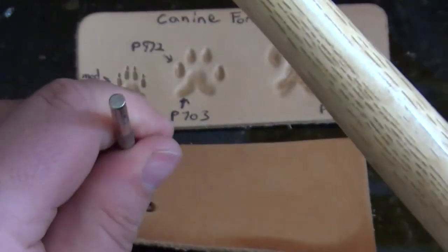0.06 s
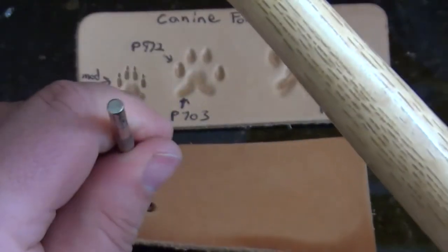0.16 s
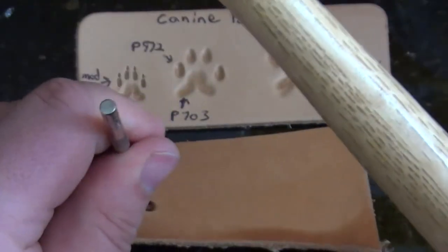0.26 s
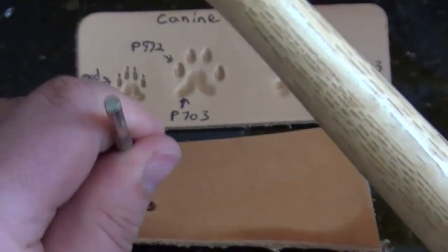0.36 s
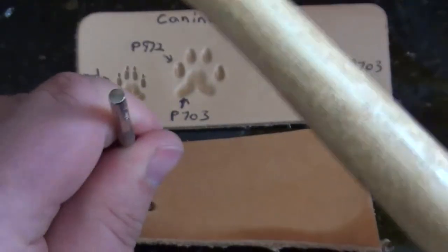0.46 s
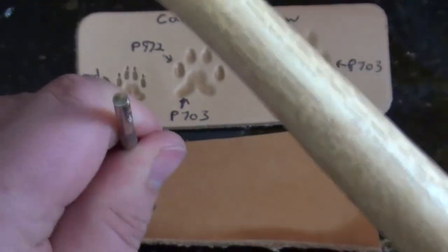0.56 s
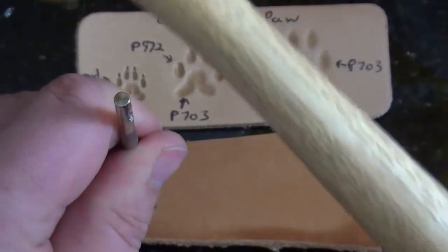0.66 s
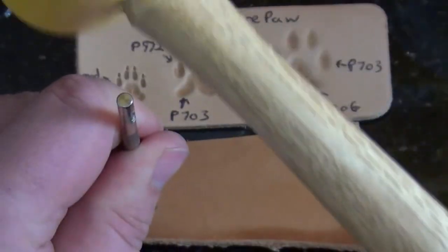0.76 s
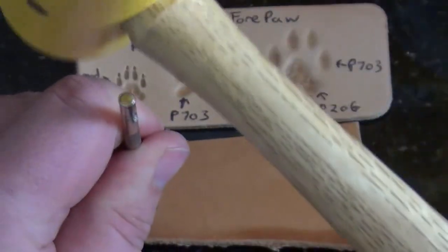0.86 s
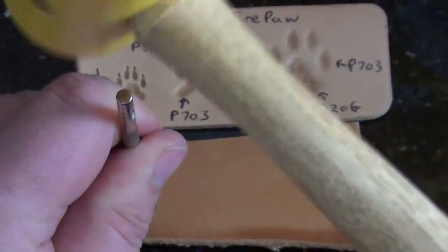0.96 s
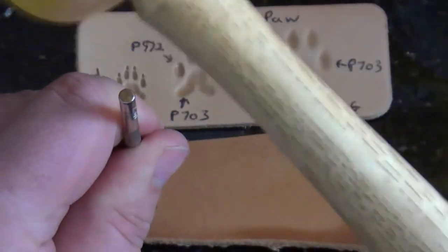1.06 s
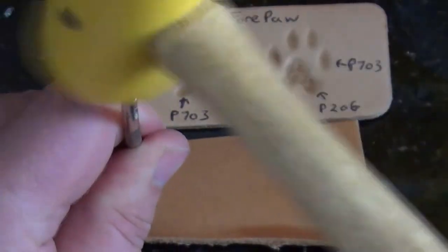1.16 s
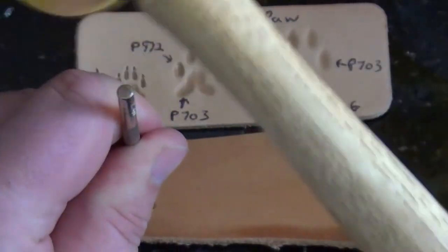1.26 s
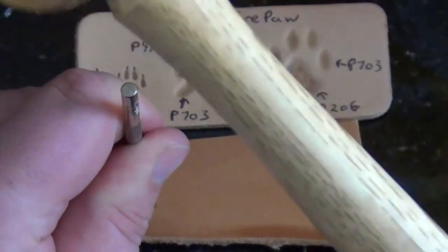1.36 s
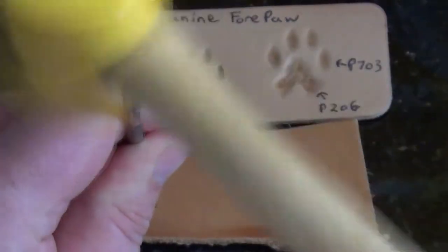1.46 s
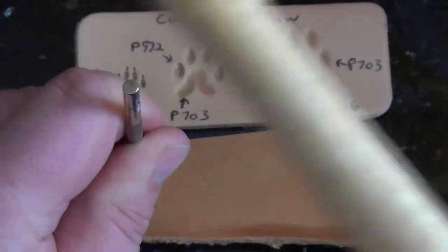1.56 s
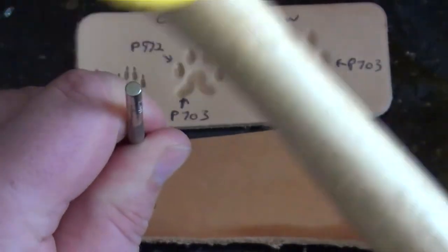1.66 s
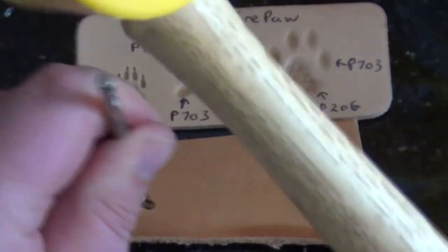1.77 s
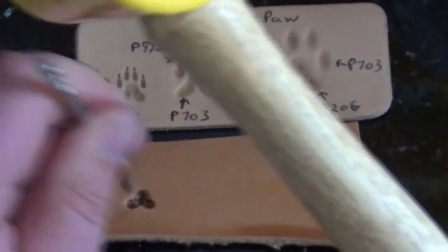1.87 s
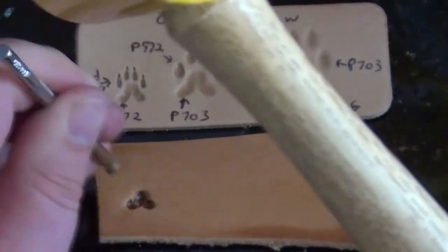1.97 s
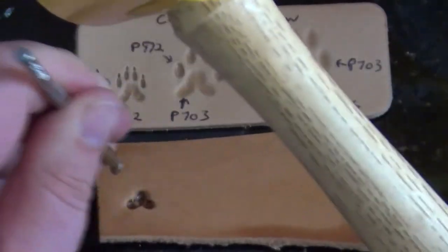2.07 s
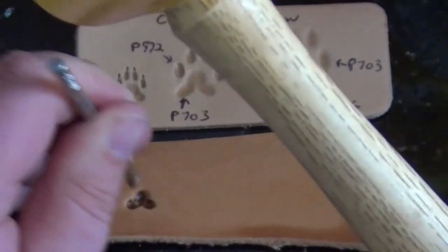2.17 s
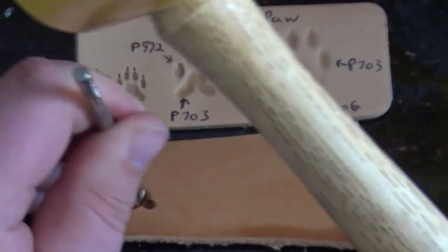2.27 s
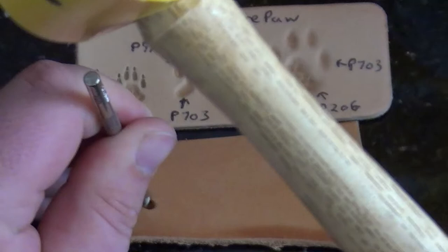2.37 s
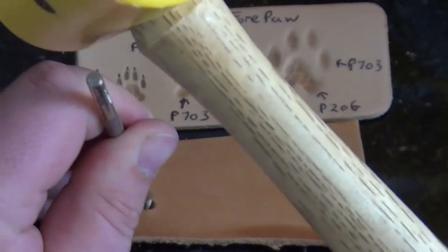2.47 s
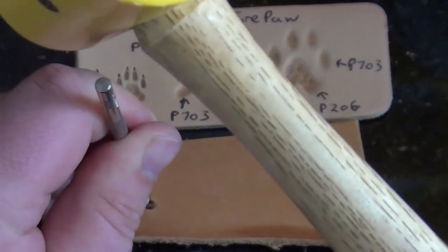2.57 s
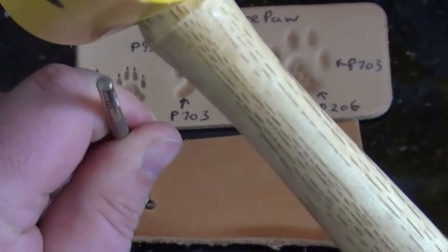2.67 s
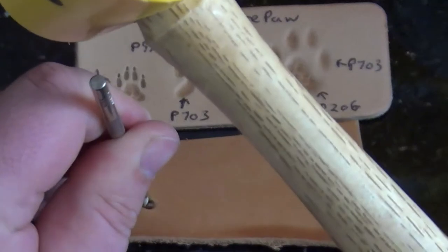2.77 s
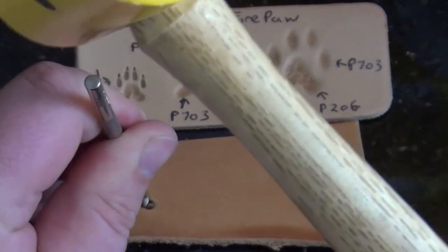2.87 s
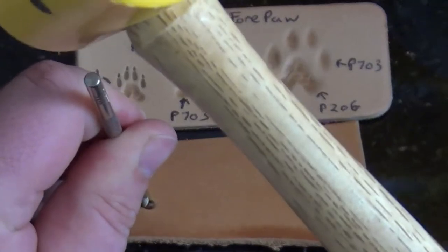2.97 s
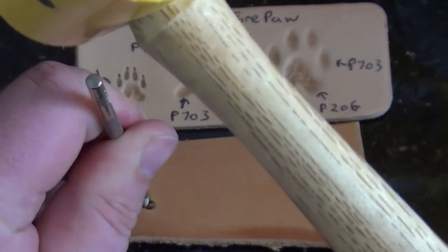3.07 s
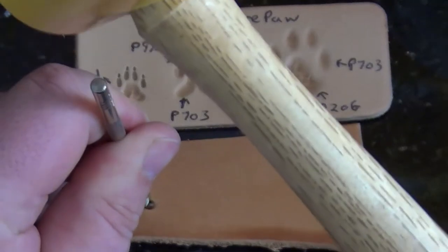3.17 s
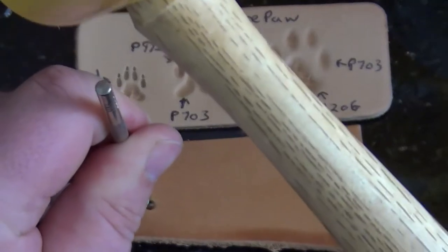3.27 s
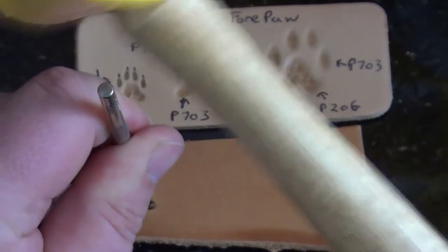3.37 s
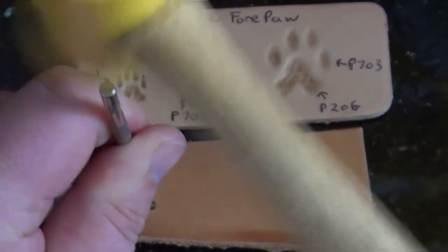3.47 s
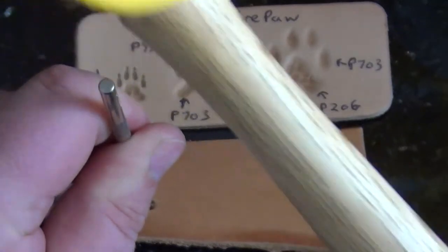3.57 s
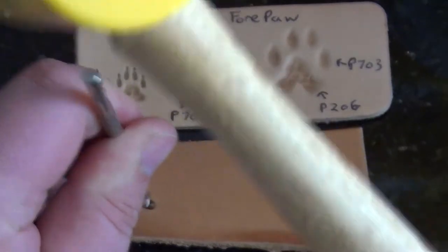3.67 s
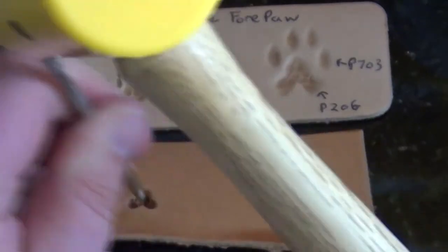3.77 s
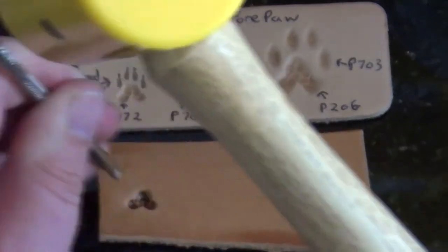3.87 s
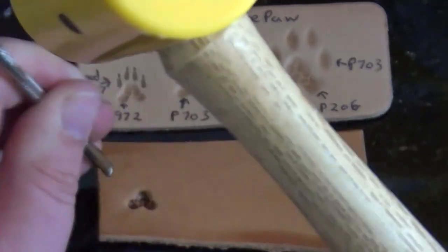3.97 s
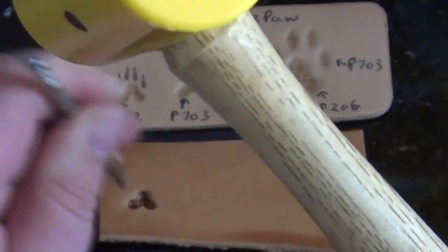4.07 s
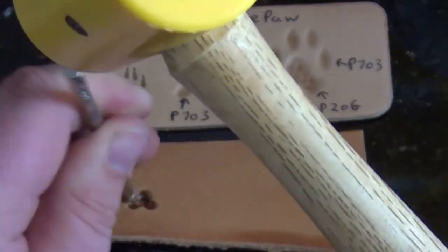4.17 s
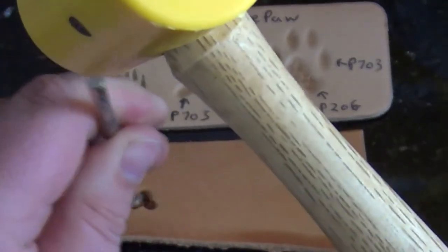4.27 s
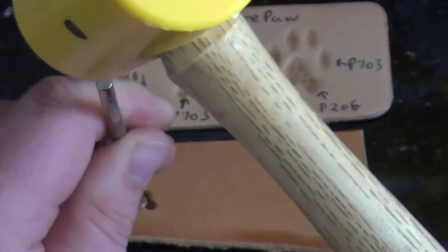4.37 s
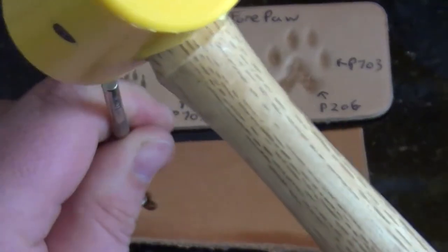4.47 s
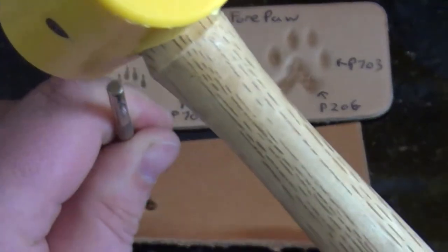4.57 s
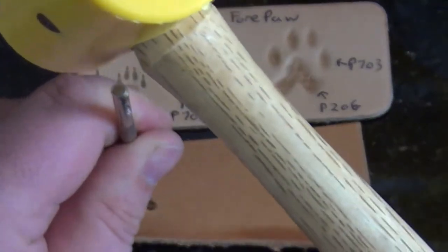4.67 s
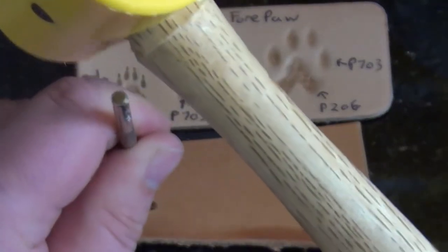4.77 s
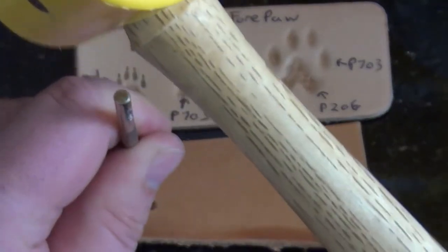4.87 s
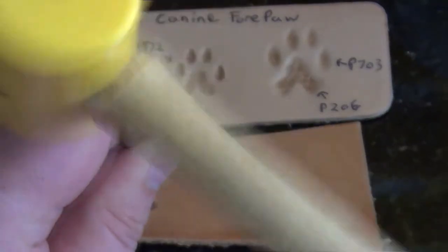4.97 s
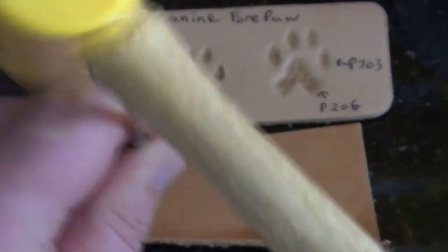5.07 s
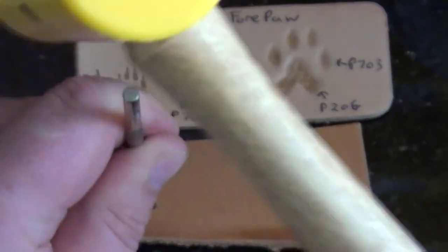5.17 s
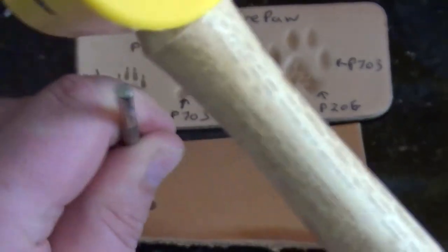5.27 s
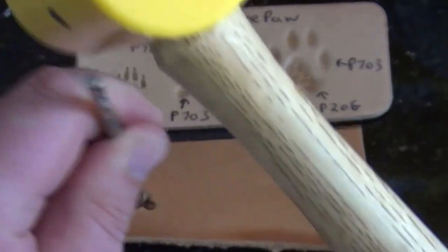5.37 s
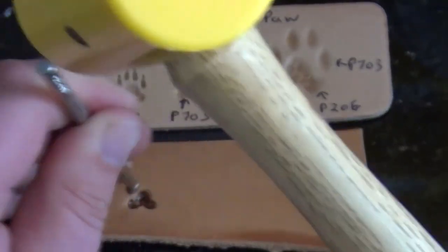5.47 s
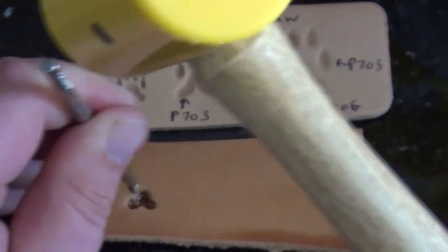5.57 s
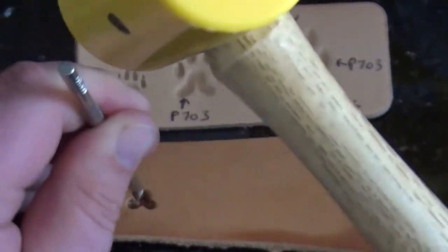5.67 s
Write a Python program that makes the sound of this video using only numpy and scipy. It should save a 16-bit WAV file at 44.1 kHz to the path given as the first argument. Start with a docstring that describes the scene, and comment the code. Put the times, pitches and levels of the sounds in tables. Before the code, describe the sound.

A quiet indoor workbench is heard close up in stereo. A low, slightly wavering fan hum near 57 Hz lies under faint air hiss, with a thin, very high electronic whine. At about 0.46 s there is a barely audible rub, then two small, clicky metallic taps at 0.58 and 0.71 s. A soft scuff with a very faint tap comes at 1.0 s. Hard mallet blows land at 1.25 and 1.6 s, the second brighter. Each is a sharp plastic-on-steel crack with a dry woody knock, short bench resonance and a slower bass thump, while loose steel tools jingle for around 0.2 s. Automatic gain flattens the peaks. Only hum, hiss and whine remain until a similar single blow at 3.55 s. After another pause, a weaker, more resonant and thumpy blow falls at 5.1 s with a shorter, fainter jingle, then background to the end.

```python
"""A fan hums under faint air noise and a very high screen whine; a brief rub and light taps lead to four blows.
A plastic mallet drives a steel stamp into damp leather on a wooden bench. Each blow is a cracking noise burst,
a diffuse knock, a slow bass thump and resonant bench modes; two loose steel tools jingle as modes struck by
random clinks. Rubbing is shaped noise that also drives the stamp's modes. A gain control flattens the blows."""
import sys
import numpy as np
from scipy import signal
from scipy.fft import rfft, irfft
from scipy.io import wavfile
from scipy.ndimage import uniform_filter1d

SR = 44100
rng = np.random.default_rng(int(sys.argv[2]) if len(sys.argv) > 2 else 0)


def master(y):
    """Save y as 16-bit WAV."""
    cut = np.clip(np.atleast_2d(y).T, -1, 1)
    pcm = np.round(cut * 32767)  # scale
    wavfile.write(sys.argv[1], SR, pcm.astype(np.int16))


N = 252252

# Spectrum of the air noise: f/Hz, relative level/dB
AIR_COLOUR = [(15, -14), (32, -11), (42, -24), (57, -2.5), (70, -9.5), (90, -3), (122, -8.5), (148, -19.5),
              (170, -14), (255, -11), (320, -17), (500, -18.5), (1310, -27), (4500, -34), (15600, -41)]
# Left-right likeness of the background: f/Hz, likeness/1 (0 to 1)
AIR_LIKENESS = [(60, 1.0), (130, 0.99), (290, 0.96), (640, 0.42), (1410, 0.0), (3100, 0.46), (6820, 0.43),
                (15000, 1)]
# Left-right likeness of the struck and rubbed sources: f/Hz, likeness/1 (0 to 1)
HIT_LIKENESS = [(60, 1), (130, 0.7), (290, 0.99), (640, 0.87), (1410, 0.68), (3100, 0.72), (6820, 0.74),
                (15000, 1)]
# Stereo balance of the struck sources: f/Hz, left minus right level/dB
HIT_BALANCE = [(60, 5.0), (110, 5.0), (200, 3.5), (380, 0.5), (700, -1.0), (1290, -1.0), (2380, -1.0),
               (4400, 0.0), (8120, -0.5), (15000, 0.0)]
# Harmonics of the fan hum: multiple/1, mean rms level/dB
FAN_HARMONICS = [(1, -50.5), (2, -57), (3, -64), (4, -64.5), (5, -59.5), (6, -65)]
# Faint wavering tones: f/Hz, full half-power width/Hz, rms level/dB
NARROW_TONES = [(1203, 30, -75.5), (2384, 49, -67.5), (3741, 100, -67)]
# Stamp tip and fingers rubbing on leather: t/s, swell time/s, length/s, peak level/dB
RUB_EVENTS = [(0.464, .032, 0.043, -54.5), (1.007, .003, .12, -44)]
# Spectrum of the rubbing: f/Hz, relative level/dB
RUB_COLOUR = [(300, -21), (490, 4), (640, -32), (800, -10), (1300, -18), (2100, -7.5), (2600, -12),
              (5000, -15.5), (9000, -18.5), (12000, -31)]
# Light taps of mallet on stamp: t/s, level/dB
TAP_EVENTS = [(.581, -32.5), (.7145, -31), (1.012, -46.5)]
# Spectrum of a tap's tail: f/Hz, relative level/dB
TAP_COLOUR = [(250, -29), (420, 6.5), (800, -2.5), (1350, -8.5), (2200, 1), (2700, -10), (5500, -4.5),
              (9500, -6.5), (11800, -10), (15000, -31)]
# Decay of a tap's tail: f/Hz, time to fall 60 dB/s
TAP_DECAY = [(500, 0.19), (2000, 0.23), (6000, 0.31), (12000, 0.21)]
# Modes of stamp shaft and mallet head, with faint lines of the loose tools (6120, 7714 Hz) that ring along:
# f/Hz, relative level/dB
STAMP_MODES = [(492, 2), (745, -3), (785, -3), (1050, -5), (2104, -4), (2250, -4), (3606, -7), (4123, -7),
               (4290, -4), (4620, -6), (5108, -7), (5410, -3), (5458, -2), (5647, -4), (6120, -7),
               (6653, -4), (6982, -3), (7062, -6), (7714, -8), (7994, -8), (9205, -4), (10174, -9)]
# Modes of two loose steel tools: f/Hz, relative level/dB, tool index/1 (0 or 1)
TOOL_MODES = [(1724, -15, 1), (2186, -20, 0), (2630, -3, 0), (3085, -12, 0), (3140, -11, 0), (3321, -12, 1),
              (4247, -10, 0), (4680, -11, 1), (4860, -1, 1), (5319, -18, 0), (5953, -15, 0), (6112, -6, 0),
              (6642, -13, 1), (6836, -16, 0), (7518, -3, 0), (7714, -22, 0), (8247, -4, 0), (8535, -11, 0),
              (8862, -15, 0), (9327, -7, 1), (9426, -10, 0), (10133, -18, 0), (10564, -12, 0),
              (10862, -23, 1), (11353, -25, 0), (12053, -24, 0), (12955, -26, 1), (13600, -25, 1),
              (14940, -12, 1), (15105, -4, 0)]
# Spectrum of the dry chatter between clinks: f/Hz, relative level/dB
CHATTER_COLOUR = [(600, -2), (1500, 5.5), (3000, -13), (9000, 6), (15000, -12.5)]
# Mallet blows: t/s, level/dB, knock tilt/(dB per octave), bench level/dB, thump level/dB,
# jingle length/s, first tool's drive level/dB, second tool's drive level/dB, second tool's swell time/s
BLOW_EVENTS = [(1.254, -0.5, 0.5, -9.5, -22, 0.16, -28, -27.5, 0.037),
               (1.592, 0, 2.15, -13, -20.5, 0.23, -27.5, -25.5, 0.053),
               (3.55, -0.5, 0.5, -13.5, -24, .22, -29.5, -27, .12),
               (5.096, -10, 0.4, -5.5, -14, 0.098, -31.5, -32, 0.032)]
# Spectrum of the diffuse knock of bench and room, before tilt: f/Hz, relative level/dB
KNOCK_COLOUR = [(30, -29), (60, -17), (200, -13.5), (300, -6), (430, -10), (900, -9), (1150, -14),
                (1380, -3), (1730, -17), (2050, -15), (3140, -9.5), (3740, -16.5), (9180, -25.5),
                (12500, -60), (15500, -44)]
# Decay of the knock: f/Hz, time to fall 60 dB/s
KNOCK_DECAY = [(60, 0.43), (250, 0.14), (1000, 0.2), (4000, .17), (12000, 0.13)]
# Modes of bench top and slab: f/Hz, relative level/dB, time to fall 60 dB/s
BENCH_MODES = [(64, -11, .4), (105, -10, .35), (146, -14, .3), (288, -10, .2), (339, -1, .24),
               (527, -11, .2), (745, -9, .2), (850, -9, .2), (882, -7, .2), (968, -11, .2), (1275, 4, .22),
               (1340, -4, .2), (1421, -4, .19), (1482, -7, .2), (1516, -8, .2), (1851, -12, .18),
               (2180, -11, .12), (2293, -12, .15), (2379, -12, .15), (2713, -11, .18), (2858, -10, .2),
               (2971, -10, .2)]
# Spectrum of the thump of legs and floor: f/Hz, relative level/dB
THUMP_COLOUR = [(44, -3), (62, 1.0), (110, -5.0), (150, 10), (220, -20.0)]
# Decay of the thump: f/Hz, time to fall 60 dB/s
THUMP_DECAY = [(60, 0.47), (150, 0.27)]
# Spectrum of the crack of plastic face on steel: f/Hz, relative level/dB
CRACK_COLOUR = [(300, -22), (700, -7), (3000, -5.5), (8000, -1), (14000, -22.5)]

# background: levels in dB rms; each lower whine tone lies FIELD_FALL_DB below the one before
AIR_DB, FAN_HZ = -54.5, 57.15
SCREEN_HZ, SCREEN_DB = 15734.3, -60
FIELD_HZ, FIELD_DB, FIELD_FALL_DB = 59.94, -75, 1.3
# rub envelope, relative to its peak
RUB_START_DB, RUB_FADE_DB, RUB_STOP_DB_S = -20, 8.5, 260
STAMP_TAP_T60, STAMP_TAP_DB = 0.092, -9
STAMP_RUB_T60, STAMP_RUB_DB = 0.063, -35
# jingle envelope, relative to its peak
JINGLE_START_DB, JINGLE_PEAK_S, JINGLE_FADE_DB, JINGLE_STOP_DB_S = -7, 0.052, 12.5, 420
CLINKS_PER_S, TOOL_T60, TOOL_DB, CHATTER_DB = 700, 0.12, (-8, -6), 1
CRACK_DB, CRACK_T60 = -9.5, 0.044
# gain control: threshold, share of the excess removed, fall rate of the held excess before that share
LIMIT_DB, LIMIT_SHARE, EXCESS_RELEASE_DB_S = -13.5, 0.79, 412
TOP_HZ = 15800


def undb(db):
    """Decibel law: amplitude gain is ten to the power of level over 20."""
    return 10 ** (np.asarray(db) / 20)


def along(table, hz):
    """Interpolation on a logarithmic frequency axis, which treats equal intervals equally."""
    at, value = np.transpose(table)
    return np.interp(np.log(np.maximum(hz, 1)), np.log(at), value)


def noise(size, db, likeness):
    """Partial coherence: independent mid and side noises set the left-right likeness at each frequency."""
    hz = np.fft.rfftfreq(size, 1 / SR)
    mid, side = rfft(rng.standard_normal((2, size))) * undb(db(hz))
    c = along(likeness, hz)
    mid = mid * np.sqrt(1 + c)
    side = side * np.sqrt(1 - c)
    return irfft(np.array([mid + side, mid - side]) / 2, size)


def walk(rate):
    """Slow random modulation: values held for 1 / rate seconds and smoothed twice, with spread near 1."""
    hold = int(SR / rate)
    steps = np.repeat(rng.standard_normal(N // hold + 1), hold)
    return 1.18 * uniform_filter1d(uniform_filter1d(steps, hold), hold)[:N]


def strength(s, rise_s, length_s, db, start_db, fade_db, stop_db_s):
    """Piecewise exponential envelope: level swells to db, fades to length_s, then falls at a steady dB rate."""
    t = np.arange(N) / SR - s
    shape_db = np.interp(t, [0, rise_s, length_s], [start_db, 0, -fade_db])
    shape_db = shape_db - stop_db_s * np.maximum(t - length_s, 0)
    return undb(db + shape_db) * (t > 0)


def ring(push, hz, db, t60, spread):
    """Damped resonance: a driven one-pole complex mode with left-right phase and level differences."""
    pole = np.exp(2j * np.pi * hz / SR - np.log(1000) / (t60 * SR))
    mode = signal.lfilter([1], [1, -pole], push)
    phase = spread * np.sqrt(1 - along(HIT_LIKENESS, hz)) * rng.standard_normal()
    pan_db = along(HIT_BALANCE, hz) / 2
    left = undb(pan_db) * (mode * np.exp(1j * phase)).imag
    right = undb(-pan_db) * (mode * np.exp(-1j * phase)).imag
    return undb(db) * np.array([left, right])


def tail(colour, t60, tilt_db, rise_s):
    """Diffuse decay: half-octave noise bands die at their own rates; rms is 1 before onset and decay."""
    t = np.arange(SR // 2) / SR
    out, power = 0, 0
    bands = 44 * 2 ** np.arange(0, 9, .5)
    in_range = (bands > .7 * colour[0][0]) & (bands < 1.1 * colour[-1][0])
    for hz in bands[in_range]:

        def shape(f):
            """Band-pass weighting: the source spectrum under a bell on the log-frequency axis."""
            bell_db = -40 * np.log2(np.maximum(f, 1) / hz) ** 2
            return along(colour, f) + tilt_db * np.log2(hz / 1000) + bell_db

        pan_db = along(HIT_BALANCE, hz) / 2 * np.array([[1], [-1]])
        band = noise(len(t), shape, HIT_LIKENESS) * undb(pan_db)
        power += np.mean(band ** 2)
        out = out + band * undb(-60 * t / along(t60, hz))
    return out * (1 - np.exp(-t / rise_s)) / np.sqrt(power)


def add(out, s, x):
    """Linear superposition: mix x into out from second s on."""
    i = int(s * SR)
    out[:, i:i + x.shape[1]] += x[:, :N - i]


def air_noise():
    """Broadband noise: a filtered random signal scaled by its mid-channel rms from 300 to 14000 Hz."""
    air = noise(N, lambda f: along(AIR_COLOUR, f), AIR_LIKENESS)
    band_pass = signal.butter(4, [300, 14000], "band", fs=SR, output="sos")
    band = signal.sosfilt(band_pass, air.mean(0))
    return air * undb(AIR_DB) / band.std()


def fan_hum():
    """Harmonic series: all multiples share one wavering rotation phase, while each level wavers alone."""
    turn = 2 * np.pi * np.cumsum(FAN_HZ * (1 + 0.00396 * walk(3.23))) / SR
    out = 0
    for multiple, db in FAN_HARMONICS:
        level = np.sqrt(2) * undb(db + 0.77 * walk(3.98))
        out = out + level * np.sin(multiple * turn + 2 * np.pi * rng.random())
    return out


def narrow_tones():
    """Narrow-band noise: a small bandwidth makes each faint tone waver at random."""
    out = 0
    for hz, width_hz, db in NARROW_TONES:
        tone = noise(N, lambda f: -10 * np.log10(1 + (2 * (f - hz) / width_hz) ** 4), AIR_LIKENESS)
        out = out + undb(db) * tone / tone.std()
    return out


def screen_whine():
    """Line spectrum: a very high whine with weaker tones below it at multiples of the field rate."""
    t = np.arange(N) / SR
    whine = undb(SCREEN_DB + 1.5 * walk(14)) * np.sin(2 * np.pi * SCREEN_HZ * t)
    for k in range(1, 8):
        cycles = (SCREEN_HZ - k * FIELD_HZ) * t + rng.random()
        whine += undb(FIELD_DB - FIELD_FALL_DB * k) * np.sin(2 * np.pi * cycles)
    return np.sqrt(2) * whine


def room_tone():
    """Superposition of the steady background sources."""
    return air_noise() + fan_hum() + narrow_tones() + screen_whine()


def rubs():
    """Friction excitation: one flickering drag shapes hiss and drives the stamp's modes faintly."""
    drag = sum(strength(*rub, RUB_START_DB, RUB_FADE_DB, RUB_STOP_DB_S) for rub in RUB_EVENTS)
    drag = drag * undb(1.2 * walk(160))
    hiss = noise(N, lambda f: along(RUB_COLOUR, f), HIT_LIKENESS)
    push = drag * rng.standard_normal(N) + 1e-18  # the tiny offset keeps the filter out of denormals
    sing = 0
    for hz, db in STAMP_MODES:
        # only the shaft's higher modes answer to rubbing
        if 2000 < hz < 7000:
            sing = sing + ring(push, hz, db + STAMP_RUB_DB, STAMP_RUB_T60, .6)
    return hiss / hiss.std() * drag + sing


def taps():
    """Multiple-contact excitation: a flurry of small impulses rings stamp, mallet and faintly the loose tools,
    with a diffuse tail."""
    out, t = np.zeros((2, N)), np.arange(SR // 2) / SR
    for s, db in TAP_EVENTS:
        # the soft mallet face settles onto the stamp in sparse contacts
        settling = t / 0.0032 * np.exp(-t / 0.0032)
        contact = settling * rng.standard_normal(len(t)) * (rng.random(len(t)) < .1)
        stamp = 0
        for hz, mode_db in STAMP_MODES:
            stamp = stamp + ring(contact, hz, mode_db + STAMP_TAP_DB, STAMP_TAP_T60, 0.99)
        grain = undb(1.5 * walk(400)[:len(t)])
        tick = grain * tail(TAP_COLOUR, TAP_DECAY, 0, 0.0011)
        add(out, s, undb(db) * (tick + stamp))
    return out


def jingle():
    """Energy transfer and loss: a blow sets both loose tools rattling, and they gradually come to rest."""
    rule = JINGLE_START_DB, JINGLE_FADE_DB, JINGLE_STOP_DB_S
    first, second = 0, 0
    for s, *_, length, first_db, second_db, second_peak_s in BLOW_EVENTS:
        first = first + strength(s, JINGLE_PEAK_S, length, first_db, *rule)
        second = second + strength(s, second_peak_s, length, second_db, *rule)
    return first, second


def tools():
    """Random impact excitation: Poisson clinks weight the modes differently, amid a dry noise chatter."""
    force = jingle()
    clinks = np.cumsum(rng.exponential(SR / CLINKS_PER_S, 5000)).astype(int)
    clinks = clinks[clinks < N]
    weight = rng.standard_normal((len(clinks), len(TOOL_MODES)))
    out = 0
    for k, (hz, db, tool) in enumerate(TOOL_MODES):
        push = np.zeros(N)
        push[clinks] = weight[:, k] * force[tool][clinks]
        out = out + ring(push + 1e-18, hz, db + TOOL_DB[tool], TOOL_T60, 0.31)
    chatter = noise(N, lambda f: along(CHATTER_COLOUR, f), HIT_LIKENESS)
    return out + undb(CHATTER_DB + 3.8 * walk(300)) * force[0] * chatter


def crack():
    """Hard-contact impact: plastic on steel gives a short, bright noise burst."""
    t = np.arange(SR // 2) / SR
    burst = noise(len(t), lambda f: along(CRACK_COLOUR, f), HIT_LIKENESS)
    return burst / burst.std() * undb(-60 * t / CRACK_T60) * (1 - np.exp(-t / 0.0012))


def bench_ring():
    """Modal superposition: an impulse rings the bench, and its modes build up as the wave spreads."""
    t = np.arange(SR // 2) / SR
    impulse = 1. * (t == 0)
    out = 0
    for hz, db, t60 in BENCH_MODES:
        rise = 1 - np.exp(-t / (0.0026 + 1.7 / hz))
        # every blow lands a little differently
        blow_db = db + 2 * rng.standard_normal()
        blow_hz = hz * (1 + .003 * rng.standard_normal())
        out = out + rise * ring(impulse, blow_hz, blow_db, t60, 1.0)
    return out


def blows():
    """Impact response: crack and diffuse knock, bench modes and a late bass thump sum at each blow."""
    out = np.zeros((2, N))
    for s, db, tilt_db, bench_db, thump_db, *_ in BLOW_EVENTS:
        knock = tail(KNOCK_COLOUR, KNOCK_DECAY, tilt_db, 0.0019) + undb(CRACK_DB) * crack()
        bench = undb(bench_db) * bench_ring()
        # the legs and floor answer slowly
        thump = undb(thump_db) * tail(THUMP_COLOUR, THUMP_DECAY, 0, 0.075)
        add(out, s, undb(db) * (knock + bench + thump))
    return out


def scene():
    """Linear superposition of all sources, from the background to the blows."""
    return room_tone() + rubs() + taps() + tools() + blows()


def record(dry):
    """Dynamic compression: short-time power ducks the gain at once, release is steady; a low-pass ends it."""
    power = uniform_filter1d((dry ** 2).max(0), size=133)  # 3 ms
    over_db = np.maximum(10 * np.log10(np.maximum(power, 1e-12)) - LIMIT_DB, 0)
    # a running maximum on a rising ramp makes the held excess fall at a steady rate
    ramp_db = EXCESS_RELEASE_DB_S * np.arange(N) / SR
    held_db = np.maximum.accumulate(over_db + ramp_db) - ramp_db
    gain = uniform_filter1d(undb(-LIMIT_SHARE * held_db), size=45)  # 1 ms
    low_pass = signal.ellip(10, .3, 80, TOP_HZ, fs=SR, output="sos")
    return signal.sosfilt(low_pass, dry * gain)


dry = scene()
out = record(dry)
master(out)
```